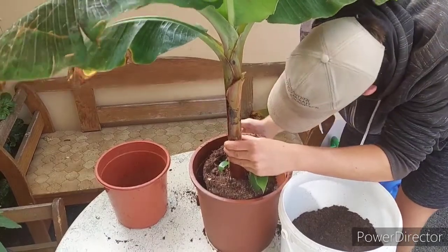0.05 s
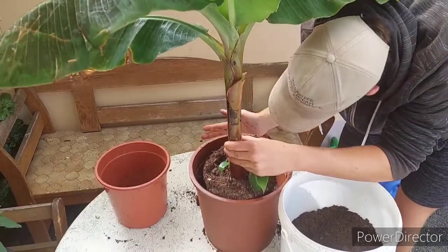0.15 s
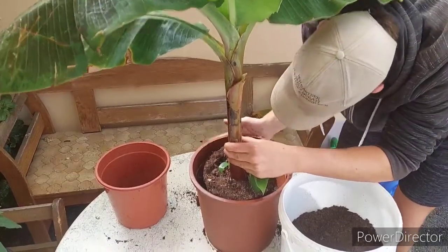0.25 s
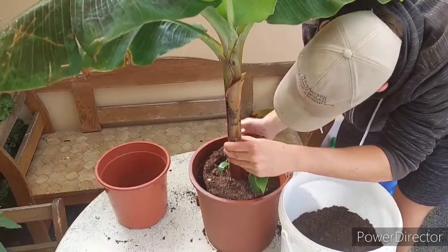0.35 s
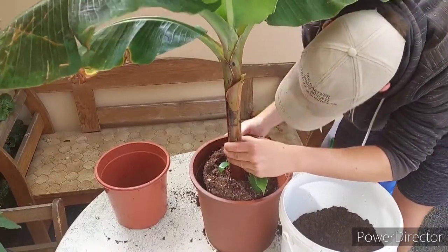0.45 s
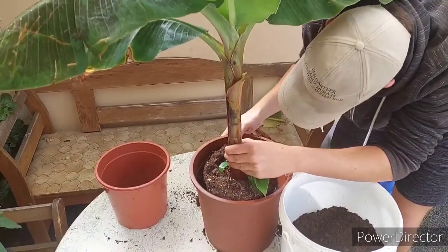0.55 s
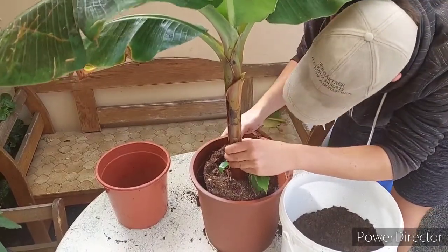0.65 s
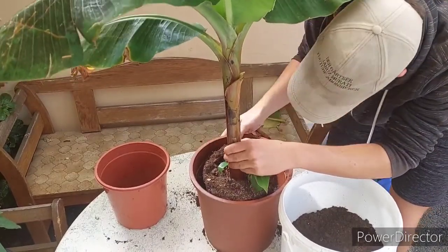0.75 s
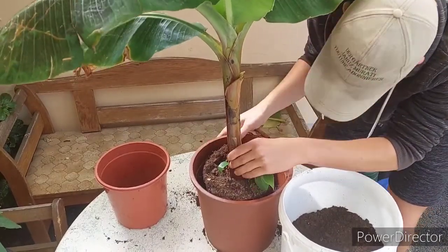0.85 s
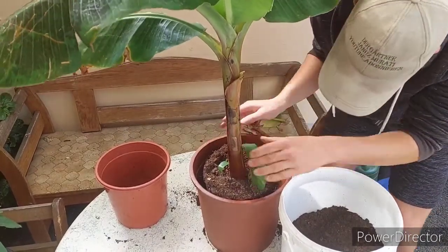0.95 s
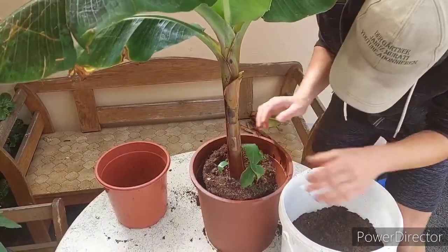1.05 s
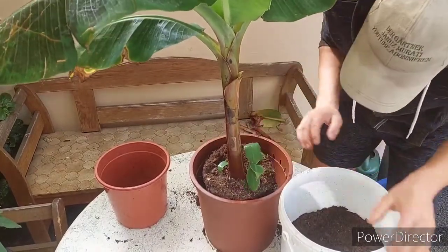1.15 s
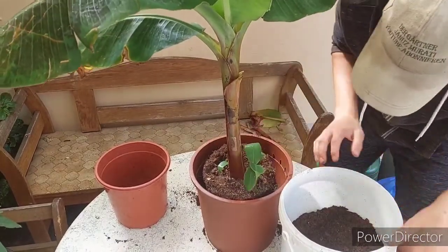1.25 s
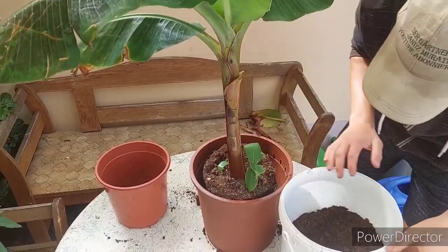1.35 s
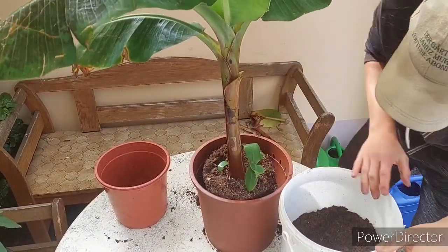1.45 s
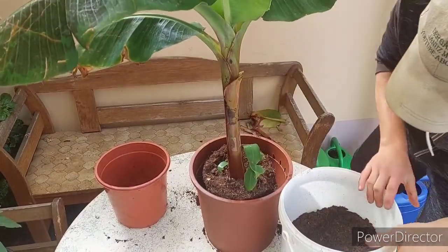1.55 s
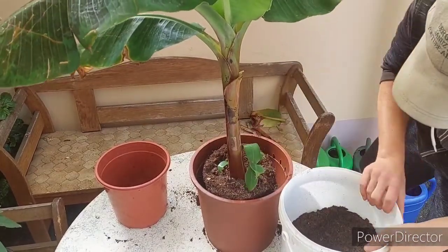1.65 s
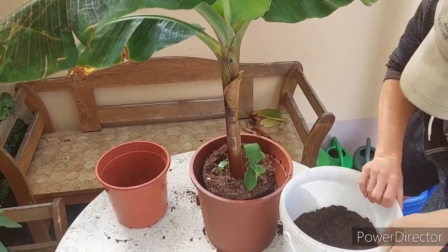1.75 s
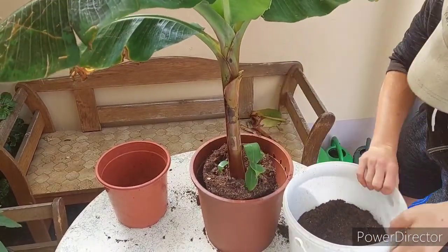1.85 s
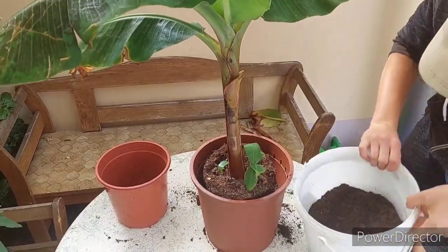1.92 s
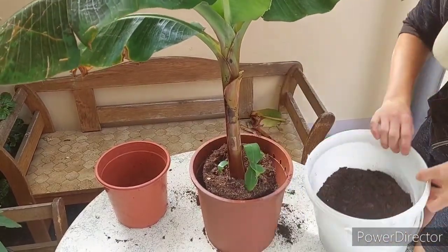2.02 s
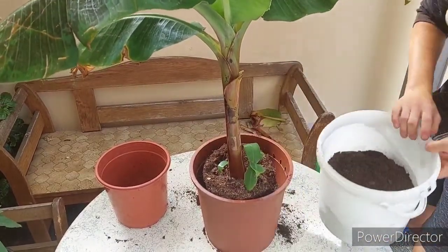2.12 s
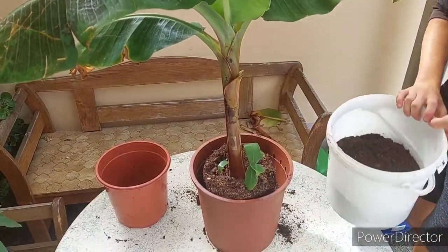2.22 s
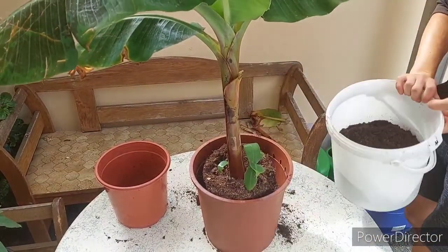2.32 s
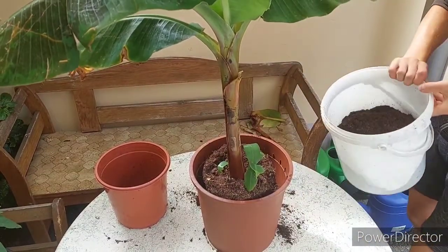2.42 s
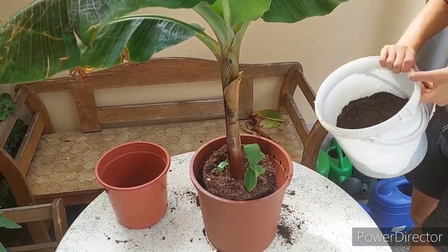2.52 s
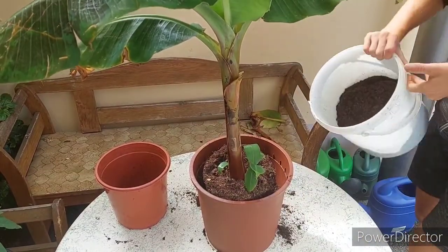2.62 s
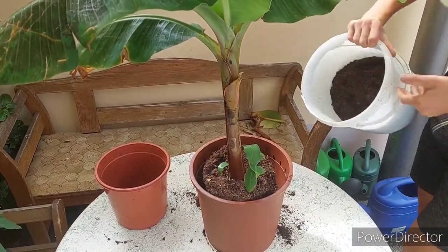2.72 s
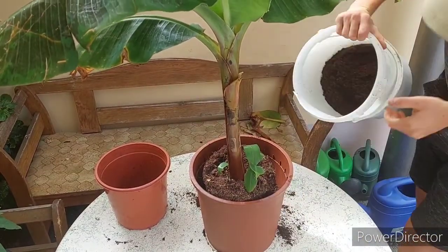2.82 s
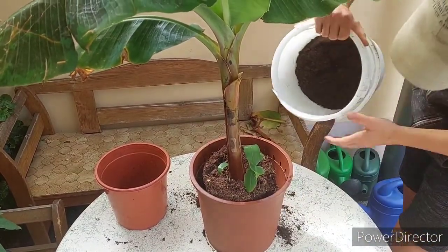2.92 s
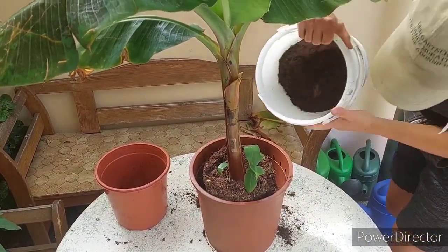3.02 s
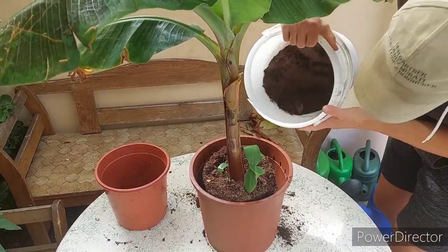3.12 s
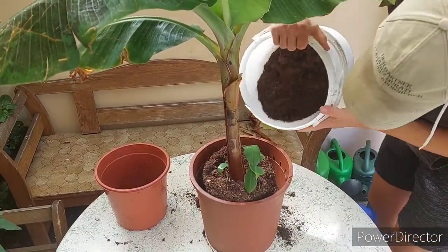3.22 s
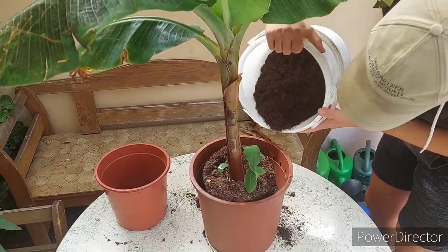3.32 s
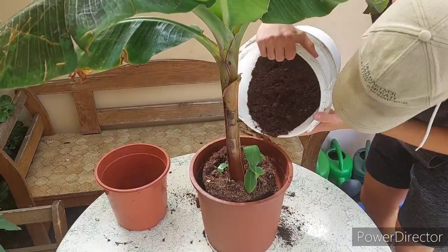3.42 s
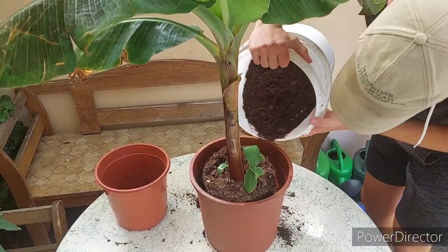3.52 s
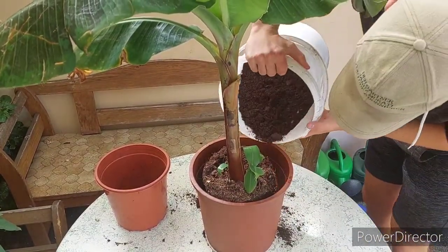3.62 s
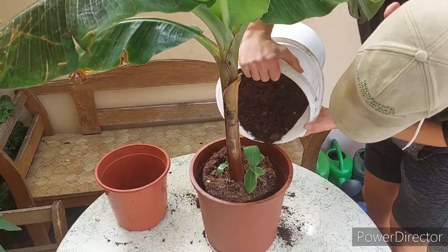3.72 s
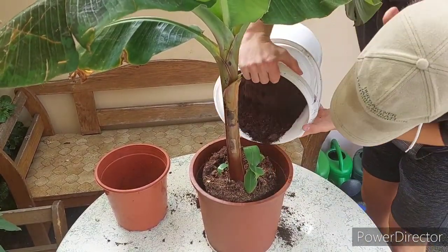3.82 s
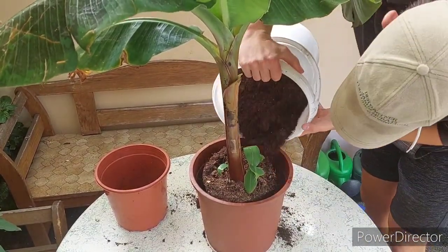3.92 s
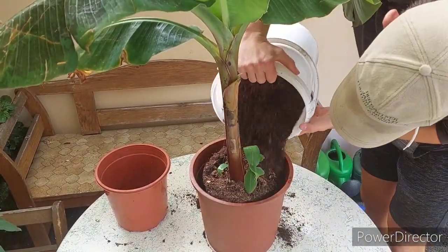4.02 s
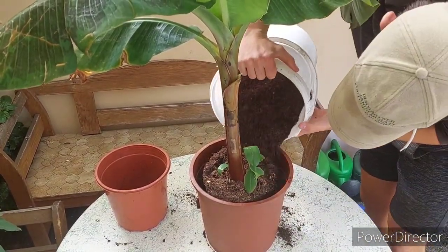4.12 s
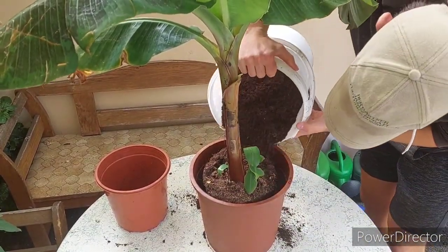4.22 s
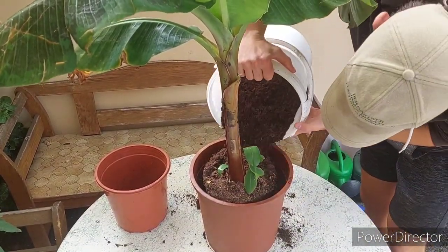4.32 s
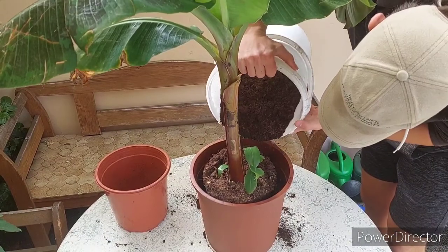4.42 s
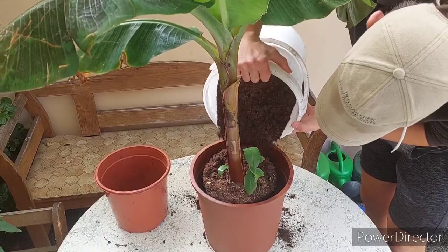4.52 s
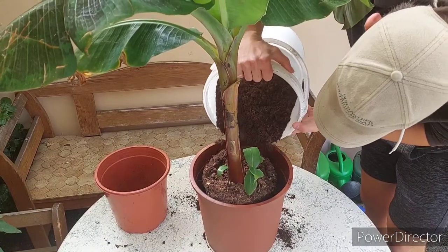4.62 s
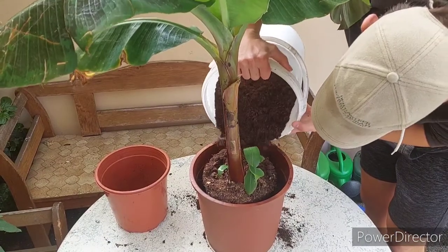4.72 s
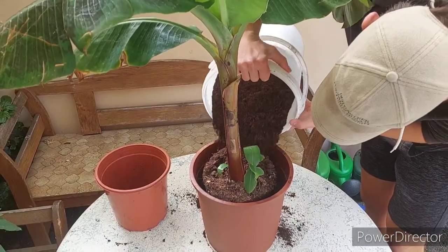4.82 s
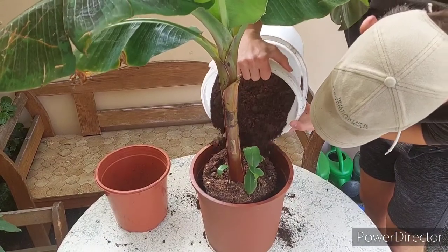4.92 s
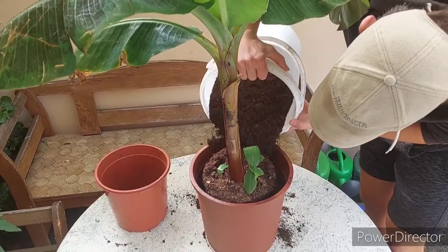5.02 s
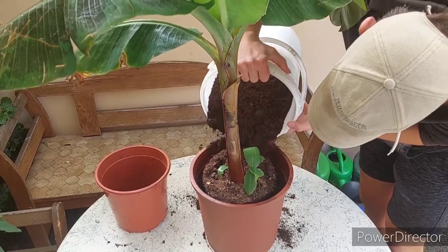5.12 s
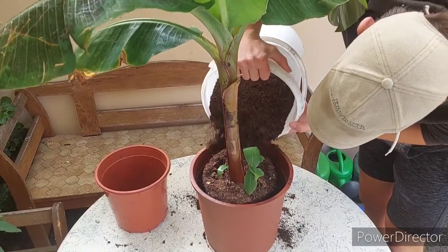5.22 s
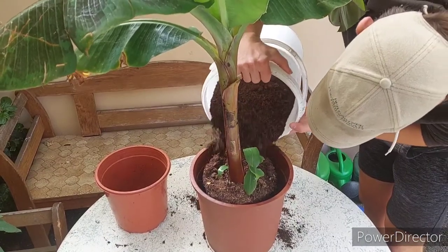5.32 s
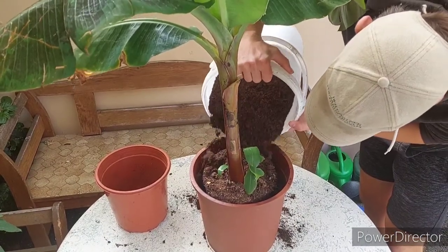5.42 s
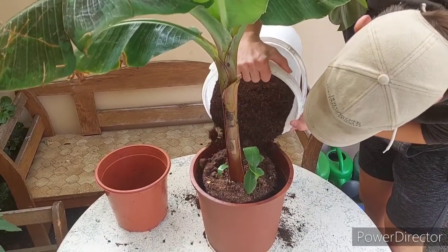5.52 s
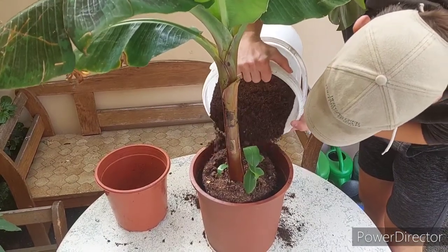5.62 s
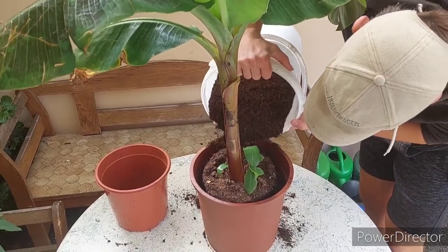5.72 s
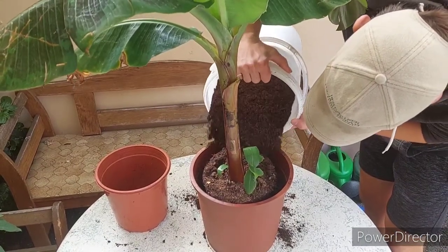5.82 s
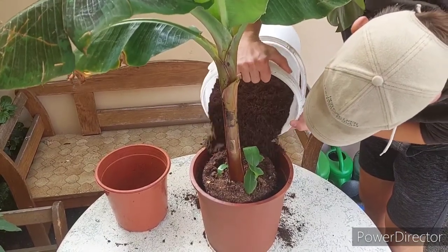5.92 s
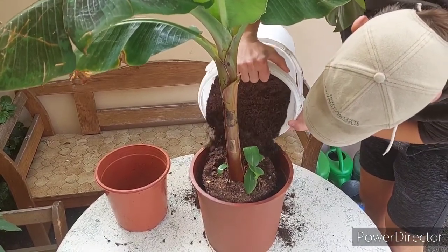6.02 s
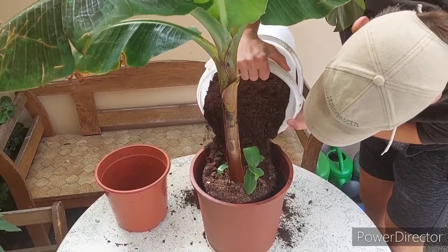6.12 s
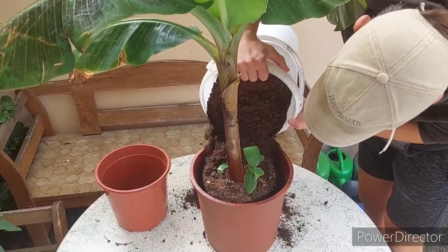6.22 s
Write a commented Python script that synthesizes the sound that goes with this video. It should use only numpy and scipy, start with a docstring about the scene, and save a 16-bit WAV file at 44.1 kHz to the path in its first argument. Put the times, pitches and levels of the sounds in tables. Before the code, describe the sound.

Hands pat potting soil in a plastic pot with dull thuds, grab and tick a plastic bucket, then crumbly soil spills out in uneven clumps.

```python
"""Hands pat potting soil in a plastic pot on a light table, grab and lift a plastic bucket, then shake soil out
of it in clumps. Knocks, crunch and grit are grain noise shaped by blow envelopes; thuds ring hollow plastic
resonances. Crumbs and cloth rustle as patchy grain noise, lumps of running soil ring briefly. The table
shudders as a wandering low tone over rumble. Walls briefly answer the hits; a faint hiss stays."""
import sys
import numpy as np
from scipy import signal
from scipy.fft import rfft, irfft, next_fast_len
from scipy.io import wavfile

SR = 44100
rng = np.random.default_rng(int(sys.argv[2]) if len(sys.argv) > 2 else 0)


def bounce(signal):
    """Save signal as a 16-bit WAV file at the path given by the first command-line argument."""
    frames = np.transpose(np.atleast_2d(signal))
    limited = np.clip(frames, -1, 1)
    pcm = np.round(limited * 32767).astype(np.int16)
    wavfile.write(sys.argv[1], SR, pcm)


N = 275777   # length in samples

# spectrum of plastic being knocked, also of crumbly scraping: f/Hz, relative density/dB
KNOCK_SPECTRUM = [(400, -5), (750, -2.5), (1250, -2), (1620, 0.5), (2100, -5), (3000, -19.5)]
# spectrum of crumbs being crushed: f/Hz, relative density/dB
CRUNCH_SPECTRUM = [(1900, -13), (2800, -3), (3700, 1.5), (4600, -8), (6500, -21.5)]
# spectrum of the finest, brightest grains: f/Hz, relative density/dB
GRIT_SPECTRUM = [(4000, -19.5), (6000, -3), (8000, -3.5), (11000, -10.5), (16000, -35.5)]
# resonances of hollow plastic, pot or bucket: f/Hz, width/Hz, relative level/dB
PLASTIC_MODES = [(105.5, 11.9, 6), (164.5, 20.6, 4), (228.7, 37.3, 1), (312, 22.9, 2), (384.7, 41, -1.5),
                 (460, 106, -6.5), (747, 245, -14)]
# each shake of the bucket lets soil run: start/s, end/s, flow level/dB
SOIL_RUNS = [(3.923, 4.06, -67.5), (4.05, 4.284, -62), (4.287, 4.61, -69.5), (4.628, 5.008, -63),
             (5.07, 5.256, -61), (5.298, 5.49, -64), (5.516, 5.736, -62.5), (5.793, 6.022, -62),
             (6.044, 6.3, -63.5)]


def blows():
    """Each blow knocks the plastic, crushes crumbs (crunch, grit) and thuds on hollow plastic, which rings on."""
    s, knock_db, thud_db, crunch_db, grit_db, t60 = all_blows()
    grains = crumbs(4000, spread_db=1.5)
    lumps = crumbs(900, spread_db=3.5)
    first = np.round((s + .002) * SR).astype(int)   # the first contact is always a big grain
    grains[first] = amp(7.5)
    grains = blotchy(grains)
    lumps[first] = amp(13.5)
    fine_grains = crumbs(3000, spread_db=0.5)

    knock_env = strokes(s, knock_db - 9, t60, rise_s=0.0008, crack_db=-3.5)
    crunch_env = strokes(s, knock_db + crunch_db - 9, 1.57 * t60, rise_s=0.0013, crack_db=8.0)
    grit_env = strokes(s, knock_db + grit_db - 15.5, 1.2 * t60, rise_s=0.00019, crack_db=8.5)
    thud_env = strokes(s, knock_db + thud_db, 0.96 * t60, rise_s=0.0029, crack_db=3.0)

    knock = colour(grains, KNOCK_SPECTRUM) * knock_env
    crunch = colour(grains, CRUNCH_SPECTRUM) * crunch_env
    grit = colour(fine_grains, GRIT_SPECTRUM) * grit_env
    thud = hollow_plastic(rms_one(lumps) * thud_env)
    return knock + crunch + grit + thud


def all_blows():
    """Pats, grabs and clumps as one list; each layer of a blow scales from its knock level and decay."""
    # the hand pats the soil: t/s, knock level/dB, then thud, grit and crunch re knock/dB
    pat_rows = [(0.068, -27.5, -1.5, -24, -6.5), (0.28, -39, 1, -8, 4.5), (0.287, -28, -4, -12, -6),
                (0.456, -24, -5, -20, -6.5), (0.477, -43.5, 12, 1, 16)]
    # the bucket is touched, gripped, lifted and tipped: t/s, knock level/dB, thud and grit re knock/dB
    grab_rows = [(1.541, -49.5, -11, 0.5), (1.766, -24.5, -18, 1.5), (1.867, -25, -17.5, -9),
                 (1.879, -32, -6, -1.5), (2.02, -38.5, -17.5, -66), (2.4, -34.5, -27, -7),
                 (2.621, -34.5, -22, -9.5), (2.633, -32, -9, -12), (3.111, -42, -11, -10.5),
                 (3.131, -32, -19, -15.5), (3.376, -41, -35, -20), (3.786, -57, -2, -19)]
    # clumps land in the pot and spill: t/s, knock level/dB, thud and grit re knock/dB, spill's base t60/s
    clump_rows = [(3.912, -42, -6, -24, 0.26), (3.965, -44.5, -26, -7, 0.21),
                  (4.098, -55, 18.5, -19, 0.048), (4.396, -40.5, -0.5, -10, 0.36),
                  (4.605, -41, 1.5, -26, 0.18), (4.732, -42.5, 10, -31, 0.058),
                  (4.783, -34.5, -5, -38, 0.082), (4.844, -48, -4.5, -6, 0.51),
                  (4.973, -30.5, -11, -23.5, 0.097), (5.057, -26.5, -6, -45, 0.1),
                  (5.132, -34, -12, -15.5, 0.17), (5.232, -53.5, 19, -24, 0.063),
                  (5.357, -43, 8.5, -56, 0.051), (5.385, -41, -7, -22, 0.3), (5.544, -39.5, -2, -35, 0.084),
                  (5.587, -33, -12.5, -15.5, 0.088), (5.701, -58, 19.5, -29, 0.1),
                  (5.726, -33.5, -11, -18, 0.043), (5.957, -33.5, -12, -21, 0.12),
                  (6.056, -35, -4, -69, 0.35), (6.099, -37, -13, -18, 0.68), (6.147, -46.5, -0.5, 1, 0.17)]
    # crunch of grabs and of clumps: base re knock/dB, added crunch per dB of grit/dB
    grab_crunch = (-3.5, 0.12)
    clump_crunch = (-1.55, 0.31)
    pat_t60_s, grab_t60_s = 0.11, 0.066   # base decays, stretched per layer

    pats = [(*row[:4], pat_t60_s, row[4], 0) for row in pat_rows]
    grabs = [(*row, grab_t60_s, *grab_crunch) for row in grab_rows]
    clumps = [(*row, *clump_crunch) for row in clump_rows]
    s, knock_db, thud_db, grit_db, t60, crunch_db, slope = np.transpose(pats + grabs + clumps)
    return s, knock_db, thud_db, crunch_db + slope * grit_db, grit_db, np.maximum(t60, .02)


def thumps():
    """One soft push per thump rings the pot's resonances, the nearer the favoured pitch the stronger."""
    # the palm's weight lands and sets the pot ringing: t/s, level/dB, favoured f/Hz
    thump_rows = [(.088, -31, 307), (.097, -33, 161), (.3, -34, 231), (.515, -39, 170)]
    loss_db_per_octave, push_s = 23, 0.00395

    s, level_db, favoured_hz = np.transpose(thump_rows)
    ringing = 0
    for hz, width, _ in PLASTIC_MODES:
        mode_db = level_db - loss_db_per_octave * abs(np.log2(hz / favoured_hz))
        pushes = np.full(N, 1e-18)
        pushes[(s * SR).astype(int)] = SR / (np.pi * width) * amp(mode_db)
        ringing = ringing + resonance(pushes, hz, width)
    push = np.hanning(round(push_s * SR))   # soft contact rounds the onset
    return signal.lfilter(2 * push / push.sum(), 1, ringing)


def clods():
    """Small lumps drop at random while soil runs; each rings briefly at one of 14 pitches."""
    low_hz, high_hz, q, pitch_count = 227, 2840, 14.5, 14
    drops = crumbs(per_s=70, spread_db=5.0)
    dealt = rng.integers(0, pitch_count, N)
    rings = 0
    for k, hz in enumerate(np.geomspace(low_hz, high_hz, pitch_count)):
        ring = rms_one(resonance(drops * (dealt == k) + 1e-18, hz, hz / q))
        rings = rings + amp(-3.5 * np.log2(hz / low_hz)) * ring   # higher lumps are weaker
    return amp(5) * spans(SOIL_RUNS, edge_s=0.057)[0] * rms_one(rings)


def handle():
    """Each tick is a sharp crack with a rattling tail, coloured by the rim's two broad resonances."""
    # the bucket's handle ticks against the rim: t/s, relative level/dB, upper resonance re lower/dB
    tick_rows = [(2.809, -31, -16), (2.834, -28.5, -4), (2.988, -40, -10), (3.0, -45, -2),
                 (3.034, -48.5, 7), (3.199, -26, -2), (3.3082, -38, 0)]
    # the rim's resonances, each passed twice: f/Hz, width of one pass/Hz
    rim_modes = [(1850, 860), (3400, 400)]

    s, level_db, upper_db = np.transpose(tick_rows)
    rattle = crumbs(3000, spread_db=1.5)
    rattle[np.round(s * SR).astype(int) + 20] = amp(8.0)   # the contact itself
    low, high = [rms_one(resonance(resonance(rattle, hz, width), hz, width)) for hz, width in rim_modes]
    low_env = strokes(s, level_db - 24, t60=0.29, rise_s=0.0001, crack_db=16)
    high_env = strokes(s, level_db + upper_db - 24, t60=0.29, rise_s=0.0001, crack_db=16)
    return low * low_env + high * high_env


def snaps():
    """A snap is a few ms of bright noise."""
    # single hard crumbs snap against plastic: t/s, relative level/dB
    snap_rows = [(0.088, -51), (1.327, -61), (2.91, -62), (3.934, -60), (4.218, -51.5), (6.097, -46),
                 (6.147, -44.5)]
    s, level_db = np.transpose(snap_rows)
    noise = rng.standard_normal(N)
    bright = colour(noise, GRIT_SPECTRUM) + amp(-3.5) * colour(noise, CRUNCH_SPECTRUM)
    return bright * strokes(s, level_db, t60=0.025, rise_s=.0002, crack_db=-4.5)


def rustle():
    """Patchy grains: crumbly scrape, bright rustle, dull lumps against hollow plastic, and a hollow narrow
    band."""
    # something rubbed rings hollow in one narrow band: start/s, end/s, level/dB
    hollow_rows = [(1.1, 1.39, -77), (1.45, 1.75, -64.5), (2.06, 2.36, -64)]
    hollow_hz, hollow_width_hz = 1625, 170
    cloth_patchiness = 0.43   # share of the running soil's unevenness

    scrape_gain, fine_gain, dull_gain = spans(stirrings(), edge_s=0.065)
    before_soil_runs = np.arange(N) / SR < SOIL_RUNS[0][0]
    patches = drift(28) * np.where(before_soil_runs, cloth_patchiness, 1)

    scrape = colour(blotchy(crumbs(600, spread_db=2.0)), KNOCK_SPECTRUM)
    scrape = scrape_gain * scrape * amp(1.7 * patches + 2.1 * drift(21))
    grit = crumbs(3000, spread_db=1.5)
    grains = blotchy(grit)
    fine = colour(grains, CRUNCH_SPECTRUM) + amp(-11.0) * colour(grit, GRIT_SPECTRUM)
    fine = fine_gain * fine * amp(3.94 * patches)
    dull = dull_gain * rms_one(hollow_plastic(crumbs(350, spread_db=2.5) * amp(2.0 * patches)))
    hollow_tone = rms_one(resonance(grains, hollow_hz, hollow_width_hz))
    hollow = spans(hollow_rows, edge_s=0.014)[0] * hollow_tone
    return scrape + fine + dull + hollow


def stirrings():
    """Scrape, bright rustle and dull patter levels of brushing hands and running soil."""
    # hands and sleeves brush soil, leaf and bucket: start/s, end/s, scrape/dB, bright rustle re scrape/dB
    brush_rows = [(0, 0.232, -66.5, -2), (0.32, 0.667, -64.5, 2.5), (0.798, 0.969, -74, 4.5),
                  (0.985, 1.054, -81.5, 16.5), (1.1, 1.23, -77.5, 0.5), (1.333, 1.407, -70.5, 5),
                  (1.469, 1.782, -62, 1), (1.768, 1.991, -59, -2), (2.093, 2.244, -61, 6),
                  (2.258, 2.607, -69, -2), (2.637, 2.761, -66, 9), (2.78, 3.107, -71.5, -2.5),
                  (3.14, 3.484, -66, -1), (3.734, 3.892, -76, 2.5)]
    hands_leave_pot_s = 1.44
    dull_in_pot_db, dull_at_bucket_db = 4.5, -7.5   # re scrape
    pour_bright_db, pour_dull_db = -2.5, 3.5   # re flow

    rows = []
    for start, end, db, bright in brush_rows:
        dull = dull_in_pot_db if start < hands_leave_pot_s else dull_at_bucket_db
        rows.append((start, end, db, db + bright, db + dull))
    for start, end, db in SOIL_RUNS:
        rows.append((start, end, db, db + pour_bright_db, db + pour_dull_db))
    return rows


def shudder():
    """The table rocks at a low pitch that wanders at random, over a wider rumble."""
    # slow trembling of the table while it is leant on and after it is let go: t/s, relative level/dB
    tremble_curve = [(0, -28), (.7, -45), (1.3, -57), (1.8, -36), (2.05, -41), (2.35, -60), (3.0, -68.5),
                     (3.85, -78.5), (6.25, -81)]
    # the table is jolted: t/s, relative level/dB
    jolt_rows = [(0.0, -18.5), (0.077, -12.5), (0.164, -25), (0.289, -15), (0.371, -22), (0.466, -15),
                 (0.518, -18), (.59, -24.5), (.815, -39.5), (1.342, -32), (1.472, -32), (1.576, -22),
                 (1.622, -16.5), (1.845, -24.5), (4.01, -29), (4.235, -29.5), (4.412, -25.5),
                 (4.486, -21.5), (4.64, -28), (4.725, -22.5), (4.958, -26.5), (5.094, -20.5), (5.16, -23.5),
                 (5.415, -25.5), (5.62, -21.5), (5.68, -26), (6.095, -20.5)]
    # spectrum of the rumble: f/Hz, relative density/dB
    rumble_spectrum = [(15, -33.5), (27, 2), (45, 0), (75, -3.5), (100, -20), (140, -21.5), (200, -45)]
    rock_hz, rock_wander_hz = 55.62, 5.85   # centre and rms wander
    pour_shudder_db = 27   # re flow
    jolt_rock_db, jolt_rumble_db = 0.5, -6   # jolts mostly rock the table

    pitch_hz = rock_hz + rock_wander_hz * drift(7.94)
    rock = np.sqrt(2) * np.sin(2 * np.pi * np.cumsum(pitch_hz) / SR)
    rumble = colour(rng.standard_normal(N), rumble_spectrum)
    s, level_db = np.transpose(jolt_rows)
    jolts = strokes(s, level_db, t60=0.38, rise_s=0.015, crack_db=0)
    pouring = amp(pour_shudder_db) * spans(SOIL_RUNS, edge_s=0.03)[0]
    steady = np.hypot(amp(in_time(tremble_curve)[0]), pouring)
    rock_gain = np.hypot(amp(-5.5 + 2.1 * drift(12.0)) * steady, amp(jolt_rock_db) * jolts)
    rumble_gain = np.hypot(steady, amp(jolt_rumble_db) * jolts)
    return rock_gain * rock + rumble_gain * rumble


def room(x):
    """Walls answer through eight feedback delays, each duller on every round, stepped block by block."""
    t60_s, wall_cut_hz = 0.29, 21000
    out = np.zeros(N)
    dull = np.exp(-2 * np.pi * wall_cut_hz / SR)
    lags = (rng.uniform(.01, .03, 8) * SR).astype(int)
    for k, lag in enumerate(lags):
        loop, state = x.copy(), [0.]
        gain = amp(-60 * lag / SR / t60_s)
        for i in range(lag, N, lag):
            back, state = signal.lfilter([gain * (1 - dull)], [1, -dull], loop[i - lag:i], zi=state)
            loop[i:i + lag] += back[:N - i]
        out += (loop - x) * (-1) ** k   # the echoes alone
    return out


def hiss():
    """Faint steady background noise."""
    # spectrum of the hiss: f/Hz, relative density/dB
    hiss_spectrum = [(22, 13), (100, 1.5), (500, -15.5), (1500, -4), (2580, -14), (3540, -4.5),
                     (5870, -15.5), (10000, -15), (15500, -25.5)]
    return amp(-72.5) * colour(rng.standard_normal(N), hiss_spectrum)


def hollow_plastic(x):
    """Hollow plastic's resonances in parallel, scaled so that noise keeps about its level."""
    ringing = 0
    for k, (hz, width, level_db) in enumerate(PLASTIC_MODES):
        ringing = ringing + (-1) ** k * amp(level_db) * resonance(x, hz, width)
    return amp(19.5) * ringing


def resonance(x, hz, width):
    """One two-pole resonance with a gain of about 1 at its peak."""
    r = np.exp(-np.pi * width / SR)
    poles = [1, -2 * r * np.cos(2 * np.pi * hz / SR), r * r]
    return signal.lfilter([(1 - r * r) / 2, 0, (r * r - 1) / 2], poles, x)


def crumbs(per_s, spread_db):
    """Random clicks of very uneven size."""
    sizes = amp(spread_db * np.minimum(rng.exponential(1, N), 5)) * rng.choice([-1, 1], N)
    return sizes * (rng.random(N) < per_s / SR) + 1e-18


def blotchy(x):
    """Third-octave bands swell and sink each on its own, so the colour keeps changing; rms 1."""
    size = next_fast_len(N)
    hz = np.arange(1, size // 2 + 2) * SR / size
    place = np.clip(3 * np.log2(hz / 500), 0, 10)   # band number, counted from 500 Hz
    spectrum = rfft(x, size)
    out = 0
    for k in range(11):
        band = irfft(spectrum * np.maximum(1 - abs(place - k), 0), size)[:N]
        out = out + amp(2.5 * drift(13)) * band
    return rms_one(out)


def strokes(times, level_db, t60, rise_s, crack_db):
    """Envelope of blows: a quick rise, a crack of a few ms on top, then a decay; powers add."""
    power = np.zeros(N)
    for s, db, t in np.broadcast(times, level_db, t60):
        start = round(s * SR)
        since = np.arange(min(round(t * SR), N - start)) / SR
        fall_db = crack_db * np.exp(-since / 0.0035) - 60 * since / t
        power[start:][:len(since)] += (amp(db + fall_db) * (1 - np.exp(-since / rise_s))) ** 2
    return np.sqrt(power)


def spans(rows, edge_s):
    """Each level column as a gain per sample: on from start to end, with soft edges; powers add."""
    t, rows = np.arange(N) / SR, np.array(rows, float)
    power = np.zeros((rows.shape[1] - 2, N))
    for start, end, *levels in rows:
        on = np.clip(np.minimum(t - start, end - t) / edge_s + .5, 0, 1)
        power += amp(levels)[:, None] ** 2 * on
    return np.sqrt(power)


def in_time(rows):
    """Each curve column as a value per sample."""
    s, *columns = np.transpose(rows)
    return [np.interp(np.arange(N) / SR, s, c) for c in columns]


def drift(rate):
    """Slow random wander of rms about 1; a higher rate wanders faster."""
    r = np.exp(-80 * np.pi * rate / SR)   # one step per 40 samples
    noise = rng.standard_normal(N // 40 + 2002)
    slow = signal.lfilter([1], [1, -2 * r, r * r], noise)[2000:]   # settled part
    return np.interp(np.arange(N) / 40, np.arange(len(slow)), rms_one(slow))


def colour(x, points):
    """Shapes a sound by a spectrum drawn over log frequency; rms 1."""
    size = next_fast_len(N)
    hz = np.maximum(np.arange(size // 2 + 1) * SR / size, 1)
    p = np.array(points)
    curve_db = np.interp(np.log(hz), np.log(p[:, 0]), p[:, 1], left=-90, right=-90)
    return rms_one(irfft(rfft(x, size) * amp(curve_db), size)[:N])


def rms_one(x):
    """Scaled to rms 1."""
    return x / np.sqrt(np.mean(x ** 2) + 1e-30)


def amp(db):
    """dB to gain."""
    return 10 ** (np.asarray(db) / 20)


def scene():
    """Hands, soil, bucket and table close by, over a faint hiss; the walls answer only the hits."""
    hits = blows() + thumps() + clods() + handle() + snaps()
    echoes = amp(-15.5) * room(hits)
    return (hits + echoes + rustle() + shudder() + hiss())[None]


def record(dry):
    """The top is cut steeply, 60 dB down from 15.6 kHz upward."""
    return signal.sosfilt(signal.cheby2(16, 60, 15600, fs=SR, output="sos"), dry)


dry = scene()
out = record(dry)
bounce(out)
```